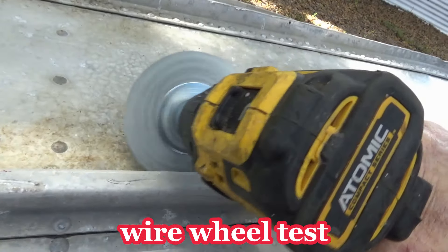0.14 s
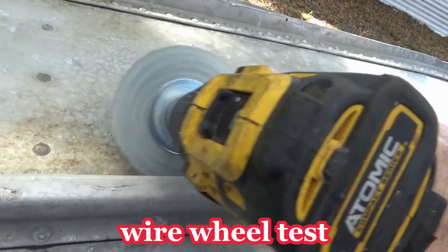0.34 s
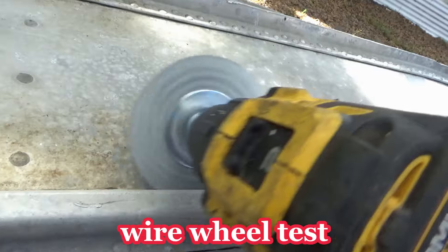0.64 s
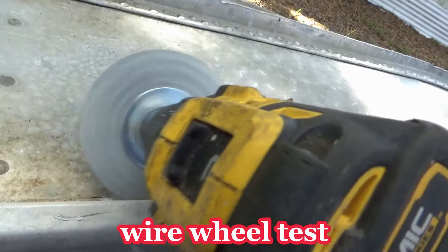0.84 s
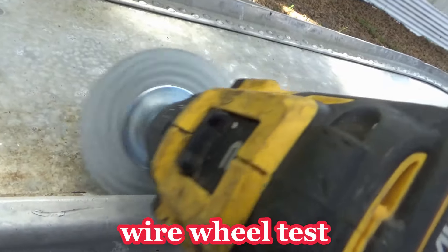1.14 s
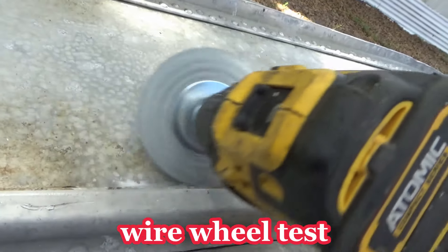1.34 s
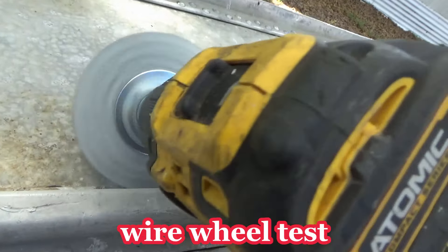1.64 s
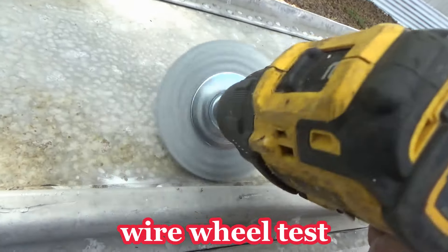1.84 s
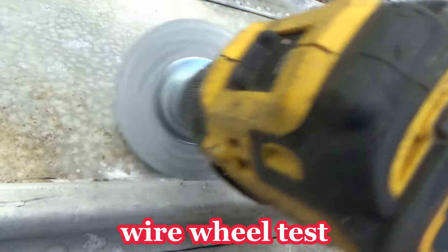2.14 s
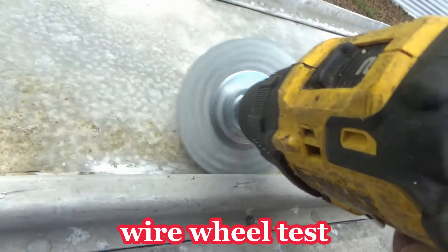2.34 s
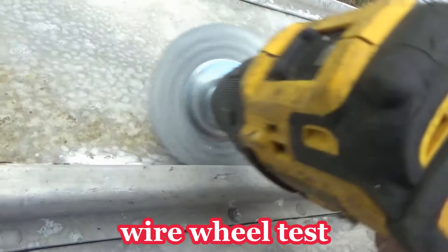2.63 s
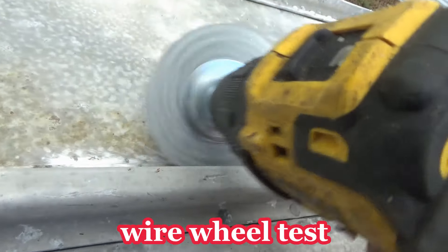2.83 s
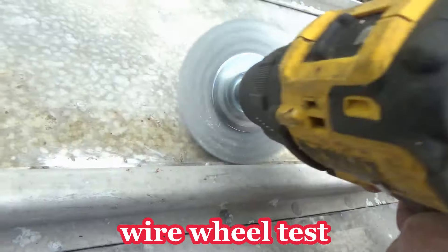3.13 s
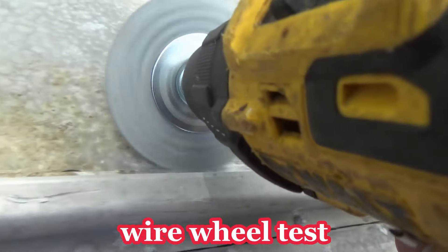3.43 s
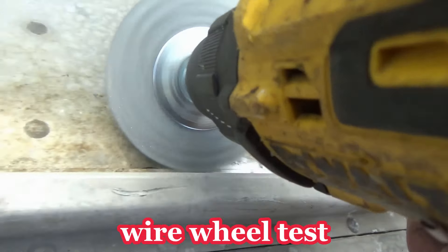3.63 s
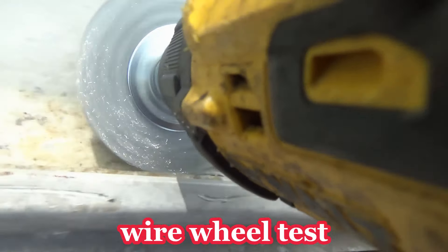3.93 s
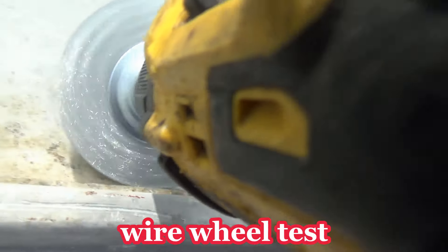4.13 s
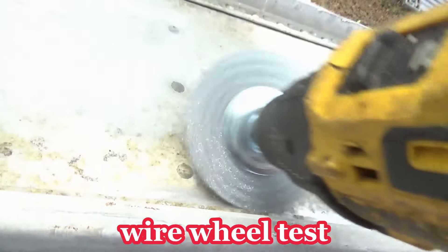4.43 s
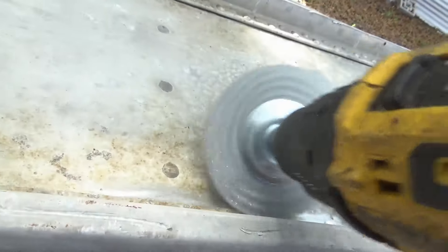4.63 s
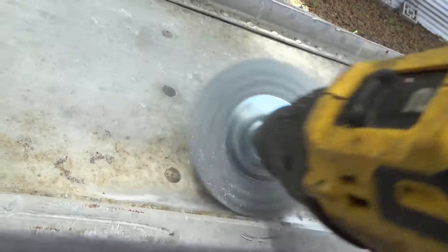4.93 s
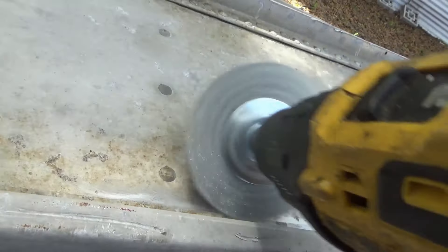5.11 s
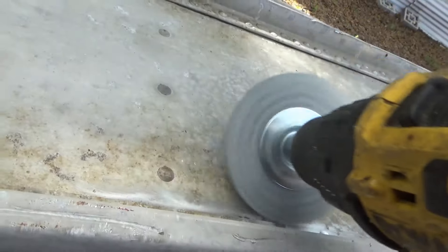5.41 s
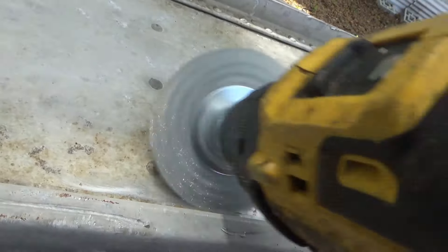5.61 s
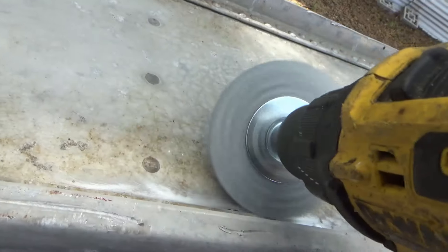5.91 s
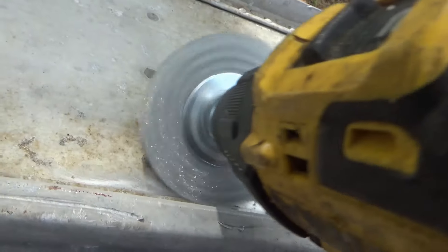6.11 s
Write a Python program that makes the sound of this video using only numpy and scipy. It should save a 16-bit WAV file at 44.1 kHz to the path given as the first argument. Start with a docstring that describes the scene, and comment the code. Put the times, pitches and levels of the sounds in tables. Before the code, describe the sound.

Continuous abrasive brushing on sheet metal: grainy mid-range clatter, bright ringing and airy hiss, already running at the start and still going at the end. A cordless drill's raspy motor whine and rougher gear tones ride through it, sagging and swelling with each stroke. High whistling appears in the later part, and a soft low bump of the hull comes near the end. Close, dry stereo microphone, work slightly to the right.

```python
"""A wire wheel in a cordless drill scrubs to and fro over the metal hull of a boat, close to the microphone.
Countless bristle tips flick the sheet: random clicks, shaped by the metal, make it clatter, ring and hiss.
The drill's motor hums and its gears whine, as tones locked to the rotor. Each push slows the rotor a little
and draws a high whistle toward the gear housing's resonance. Now and then the hull gives a soft bump."""
import sys
import numpy as np
from scipy import signal
from scipy.fft import rfft, irfft, next_fast_len
from scipy.io import wavfile

SR = 44100
rng = np.random.default_rng(int(sys.argv[2]) if len(sys.argv) > 2 else 0)


def store_wav(level_fs):
    """Save 16-bit WAV to argv[1]."""
    pcm = np.round(np.clip(np.atleast_2d(level_fs), -1, 1) * 32767)
    wavfile.write(sys.argv[1], SR, pcm.T.astype(np.int16))


N = 276013
TIME = np.arange(N) / SR  # seconds
SIZE = next_fast_len(N + 2048, True)
BINS = np.maximum(np.arange(SIZE // 2 + 1) * SR / SIZE, 1)  # Hz
GEAR_RATIO = 15.05  # rotor turns per turn of the wheel


def from_db(db):
    """Turn decibels into gain."""
    return 10 ** (np.asarray(db) / 20)


def rms_one(x):
    """Scale to unit power."""
    return x / np.sqrt(np.mean(x ** 2) + 1e-20)


def in_time(rows):
    """Give each column of a time table a value at every sample."""
    seconds, *columns = np.transpose(rows)
    return [np.interp(TIME, seconds, column) for column in columns]


def in_frequency(points):
    """Give a frequency table a value at every frequency bin, with pitch on a log scale."""
    hz, value = np.transpose(points)
    return np.interp(np.log(BINS), np.log(np.maximum(hz, 1)), value)


def drift(rate_hz):
    """Smooth random wandering, mostly slower than rate_hz; its spread is 1."""
    coarse = TIME[::20]
    hz = np.fft.rfftfreq(len(coarse), coarse[1])
    spectrum = rfft(rng.standard_normal(len(coarse))) / (1 + (hz / rate_hz) ** 2)
    slow = irfft(spectrum, len(coarse))
    return np.interp(TIME, coarse, rms_one(slow))


# The hand's strokes; where they overlap, their forces add. A force of 1 is a firm push.
# (start [s], end [s], force at start [firm pushes], force at end [firm pushes]), before the rise and fall
HAND_STROKES = [(-.27, .16, .74, 1.05), (.08, .61, .6, .68), (.52, 1.07, .56, 1.02),
                (1.08, 1.27, 1.6, 1.17), (1.15, 1.46, .56, 1.7), (1.53, 1.88, 1.27, 1.15),
                (1.95, 2.43, 1.52, .17), (2.35, 2.9, 1.42, .66), (2.76, 3.21, .72, 1.44),
                (3.22, 3.78, 1.37, .33), (3.51, 4.65, .41, .55), (4.52, 5.05, .33, 1.47),
                (5.01, 5.52, 1.12, .93), (5.47, 5.95, 1.09, 1.35), (5.8, 6.35, .35, 1.47)]
PRESS_S, EASE_S = .22, .154  # time to lean in fully, time to ease off


def pressure():
    """Force of the wheel on the hull: every stroke rises, leans in or slackens, and falls."""
    push = 0
    for start, end, first, last in HAND_STROKES:
        force = np.interp(TIME, [start, end], [first, last])
        rise_and_fall = np.minimum((TIME - start) / PRESS_S, (end - TIME) / EASE_S)
        push = push + force * np.clip(rise_and_fall, 0, 1)
    return push


# What a firm push adds to each part of the sound: {part: change in level [dB]}
FIRM_PUSH_DB = {"hum": 1.1, "second": -3, "motor": 1.5, "overtones": 4, "gears": 3, "upper gear": 6,
                "whistle": 9.5, "clatter": -0.4, "skitter": -4.5, "sheet": 1, "ring": 8, "high ring": 7.5,
                "hiss": -0.4, "rumble": 1}


def push_db(part, push):
    """Change in a part's level, in dB, in proportion to the push."""
    return FIRM_PUSH_DB[part] * push


def flicks(per_s, spread_db):
    """Bristle tips snap free at random, each with a force of its own."""
    luck = np.minimum(rng.exponential(1, SIZE), 4)
    force = from_db(spread_db * luck) * rng.standard_normal(SIZE)
    return rms_one(force * (rng.random(SIZE) < per_s / SR))


# How alike the brushing is at the two microphone ports
# (frequency [Hz], likeness [0 = unlike, 1 = the same; capped at .995])
PORT_LIKENESS = [(60, .98), (170, 0.98), (330, 1), (500, 0.88), (800, 0.35), (1200, 0.6), (1800, 0.88),
                 (2800, 0.38), (4500, 0.68), (6400, 0.43), (9000, 0.88), (10500, 1), (15000, 1)]


def brushed(colour, modes, per_s, spread_db):
    """Flicks shaped by the metal's colour and resonances; the wide sheet reaches the ports partly unlike."""
    body = 1
    for hz, width, db in modes:
        body = body + from_db(db) / (1 + 1j * (BINS ** 2 - hz ** 2) / (BINS * width))
    alike = np.clip(in_frequency(PORT_LIKENESS), 0, .995)
    mid = rfft(flicks(per_s, spread_db))
    side = rfft(flicks(per_s, spread_db))
    ports = np.sqrt(1 + alike) * mid + np.sqrt(1 - alike) * side * [[1], [-1]]
    return rms_one(irfft(ports * body * from_db(in_frequency(colour)), SIZE)[:, :N])


def whine(turns, orders, flutter_db, smear, wander):
    """Tones locked to a shaft; play between parts shakes each level and phase (smear, wander: radians)."""
    tones = 0
    for order, db in orders:
        gain = from_db(db + flutter_db * drift(67))
        phase = 2 * np.pi * (order * turns + rng.random()) + smear * drift(126) + wander * drift(20)
        tones = tones + gain * np.sin(phase)
    return rms_one(tones)


# Broad colour of the hull's clatter: (frequency [Hz], relative level per Hz [dB])
CLATTER_COLOUR = [(60, -58), (250, -44), (450, -20.5), (650, -15), (1000, -9.5), (1500, -6), (1700, -4),
                  (2050, -6.5), (2400, -6.5), (2900, -4), (4000, -37), (10000, -55)]
# Hull resonances: (frequency [Hz], width [Hz], strength against the colour [dB])
HULL_RESONANCES = [(592, 66, -10), (850, 21, -8), (1233, 49, -12.5), (1448, 61, -19.5), (1846, 180, -3.5),
                   (1870, 250, -7.5)]


def hull_clatter(level_db, push, grip_db):
    """The hull's lower resonances answer the flicks."""
    noise = brushed(CLATTER_COLOUR, HULL_RESONANCES, per_s=26000, spread_db=0.7)
    return from_db(level_db + push_db("clatter", push) + grip_db) * noise


# Broad colour of the ringing sheet: (frequency [Hz], relative level per Hz [dB])
SHEET_COLOUR = [(150, -75), (1800, -41), (2500, -5.5), (2900, -2.5), (3350, -1), (3700, -0.5), (4050, -2),
                (4600, -1.5), (5000, -4), (5400, -3), (6000, -8), (7200, -12), (10000, -43)]
# Sheet resonances: (frequency [Hz], width [Hz], strength against the colour [dB])
SHEET_RESONANCES = [(2880, 110, -9.5), (3330, 300, -7), (4240, 41, -4.5), (4640, 180, -15), (4880, 100, -5),
                    (2560, 130, -9), (5720, 200, -13)]


def sheet_ring(level_db, push, grip_db):
    """The thin sheet rings in its higher resonances under the flicks."""
    noise = brushed(SHEET_COLOUR, SHEET_RESONANCES, per_s=30000, spread_db=1.6)
    return from_db(level_db + push_db("sheet", push) + grip_db) * noise


# Colours of the tips' hiss and of their finest spray: (frequency [Hz], relative level per Hz [dB])
HISS_COLOUR, FIZZ_COLOUR = [(200, -70), (3500, -11), (5500, -4), (6500, 3), (7200, -1), (7800, 6),
                            (9200, 2), (9900, -5.5), (11000, -17), (12500, -18), (14000, -22), (15500, -31)], [(3000, -45), (8500, -4.5), (10200, 1.5), (11800, -0.5),
                                          (13500, -6.5), (15000, -19)]
# Level of the finest spray before its random swings: (time [s], level [dB])
FIZZ_LEVELS = [(0, -36.5), (.7, -37.5), (.85, -42.5), (1.05, -35.5), (1.25, -39), (1.5, -38), (2.05, -38),
               (2.65, -38.5), (2.78, -40.5), (2.92, -37.5), (3.3, -39.5), (4.1, -39), (4.3, -41.5),
               (4.75, -38), (4.97, -42), (5.1, -40.5), (5.32, -40), (5.44, -40.5), (5.56, -38.5),
               (5.88, -39), (6.1, -38), (6.26, -38)]
HISS_FOLLOWS = 0.66  # share of the spray's table swings that the hiss follows


def tip_hiss(level_db, push, grip_db):
    """The bristle tips' hiss and finest spray; the hiss partly follows the spray."""
    fizz_db, = in_time(FIZZ_LEVELS)
    bite_db = HISS_FOLLOWS * (fizz_db - fizz_db.mean()) + 0.6 * drift(16)
    hiss_gain = from_db(level_db + push_db("hiss", push) + grip_db + bite_db)
    hiss = hiss_gain * brushed(HISS_COLOUR, [], per_s=36000, spread_db=2.5)
    fizz_gain = from_db(fizz_db + grip_db + 1.3 * drift(25))
    fizz = fizz_gain * brushed(FIZZ_COLOUR, [], per_s=34000, spread_db=2.5)
    return hiss + fizz


# The two bands that ring out under a push: (frequency [Hz], relative level per Hz [dB])
RING_COLOUR, HIGH_RING_COLOUR = [(1500, -45), (2700, -27), (3000, -7.5), (3280, -3.5), (3500, -9.5),
                                 (4000, -23), (6500, -45)], [(3000, -44), (4300, -12), (4550, -7), (4750, 1), (5000, -16),
                                               (5250, -7), (6500, -35)]
# Each spot of the hull favours one band or the other; levels with no push
# (time [s], ring level [dB], high ring level [dB])
RING_LEVELS = [(0, -44, -43), (.25, -29.5, -33), (.55, -38, -41), (.8, -33, -41), (1.3, -34, -37),
               (1.8, -33.5, -37), (2.3, -37, -34), (2.52, -32.5, -36), (2.73, -42, -41), (2.95, -31, -39),
               (3.3, -53, -39), (3.75, -35.5, -35), (4.3, -31, -34), (4.55, -44, -45), (5.2, -41, -40),
               (5.8, -47, -39), (6.26, -36, -42)]


def pressed_ring(push):
    """Two bands of the sheet ring out much louder as the wheel is pressed."""
    ring_db, high_db = in_time(RING_LEVELS)
    ring_gain = from_db(ring_db + push_db("ring", push) + 1.4 * drift(16))
    ring = ring_gain * brushed(RING_COLOUR, [], per_s=30000, spread_db=-1.0)
    high_gain = from_db(high_db + push_db("high ring", push) + 1.0 * drift(14))
    return ring + high_gain * brushed(HIGH_RING_COLOUR, [], per_s=30000, spread_db=-3.5)


# The band where the lightly scraped hull sings: (frequency [Hz], relative level per Hz [dB])
SKITTER_COLOUR = [(1300, -39.5), (1700, -2.5), (1900, -3.5), (2060, 0), (2200, -2.5), (2500, -7.5),
                  (3000, -31)]
# Its level with no push: (time [s], level [dB])
SKITTER_LEVELS = [(0, -26), (.5, -27), (1.2, -29.5), (1.8, -28.5), (2.3, -30), (3.3, -28.5), (4.2, -34.5),
                  (4.6, -28), (6.26, -28.5)]


def skitter(push):
    """The hull sings while the wheel skitters lightly over it; a push quiets it."""
    level_db = in_time(SKITTER_LEVELS)[0] + push_db("skitter", push)
    return from_db(level_db) * brushed(SKITTER_COLOUR, [], per_s=24000, spread_db=-0.5)


# Narrow resonances inside the skitter band: (middle frequency [Hz], relative level [dB])
STRAND_RESONANCES = [(1730, -0.5), (1830, -1.5), (1930, -0.5), (2060, -2)]
STRANDS_DB = -2.5  # level against the skitter
STRAND_WIDTH_HZ, STRAND_WAVER_HZ, STRAND_SWELL_DB = 12, 22.99, 1.4


def strands(push):
    """Narrow hull resonances waver in pitch, swell and fade as the wheel moves from spot to spot."""
    out = 0
    for hz, db in STRAND_RESONANCES:
        pitch = hz + STRAND_WAVER_HZ * drift(4)
        # slow noise in two parts widens the tone into a narrow band
        narrow_noise = drift(STRAND_WIDTH_HZ) + 1j * drift(STRAND_WIDTH_HZ)
        ringing = narrow_noise * np.exp(2j * np.pi * np.cumsum(pitch) / SR)
        out = out + from_db(db + STRAND_SWELL_DB * drift(4)) * ringing.real
    level_db = in_time(SKITTER_LEVELS)[0] + push_db("skitter", push) + STRANDS_DB
    return from_db(level_db) * rms_one(out)


# Broad colour of the hull's rumble: (frequency [Hz], relative level per Hz [dB])
RUMBLE_COLOUR = [(20, -15), (70, -17), (130, -16), (170, -2), (215, -3), (240, 2), (290, 8), (400, 2),
                 (600, -16), (1200, -40)]


def hull_rumble(level_db, push):
    """Sparser flicks shake the hull at low pitch."""
    around_mean_db = push_db("rumble", push - push.mean())
    noise = brushed(RUMBLE_COLOUR, [], per_s=4000, spread_db=1.5)
    return from_db(level_db + around_mean_db + 1.8 * drift(9)) * noise


# Tones of the uneven tufts: (multiple of the wheel speed, relative level [dB])
TUFT_TONES = [(7, -5), (9, 6), (11, -1), (12, -2), (16, 3), (19, 1), (24, 4.5)]
# Level of their drone before random swings: (time [s], level [dB])
TUFT_LEVELS = [(0, -61.5), (1.6, -61), (2.1, -56), (2.33, -50), (2.55, -58), (2.8, -53), (3.0, -54),
               (3.28, -49.5), (3.45, -61), (5, -63.5), (6.26, -61)]


def tuft_drone(turns):
    """Uneven tufts strike the hull again on every turn of the wheel and make it drone."""
    gain = from_db(in_time(TUFT_LEVELS)[0] + 2.4 * drift(4.6))
    return gain * whine(turns / GEAR_RATIO, TUFT_TONES, flutter_db=5.0, smear=0.26, wander=.25)


# Slow changes as the wheel travels over the hull, before the push and random swings
# (time [s], hull clatter level [dB], sheet ring level [dB], tip hiss level [dB], hull rumble level [dB])
BRUSHING_LEVELS = [(0, -24.5, -22.5, -27.5, -58), (1.6, -24.5, -23.5, -25.5, -59),
                   (2.4, -24, -24.5, -26, -56), (3.1, -24.5, -23.5, -25.5, -57),
                   (3.7, -24, -24.5, -28, -61), (4.28, -25, -24, -28, -53), (4.5, -25, -25, -25, -70),
                   (5.3, -25.5, -25, -25, -64), (6.26, -24.5, -25.5, -29, -62)]


def wire_wheel(turns, push):
    """The bristles drive the hull from rumble to hiss; the drill's shake ripples the upper parts."""
    clatter_db, sheet_db, hiss_db, rumble_db = in_time(BRUSHING_LEVELS)
    grip_db = 0.75 * drift(25) + 0.13 * drift(12.0)
    ripple = 1 + 0.095 * np.sin(2 * np.pi * turns)  # once per rotor turn
    upper = sheet_ring(sheet_db, push, grip_db) + pressed_ring(push) + tip_hiss(hiss_db, push, grip_db)
    lower = hull_clatter(clatter_db, push, grip_db) + skitter(push) + hull_rumble(rumble_db, push)
    return ripple * upper + lower + tuft_drone(turns)


# Rotor speed running free at the start, its steady decline, and its sag under a firm push
FREE_HZ, DECLINE_HZ_PER_S, SAG_HZ = 378.2, 2.74, 15


def rotor_turns(push, wobble, unrest):
    """The rotor sags under a push; drag sways it once per turn of the uneven wheel, and at random."""
    speed = FREE_HZ - DECLINE_HZ_PER_S * TIME - SAG_HZ * push
    wheel = np.cumsum(speed) / SR / GEAR_RATIO
    unevenness = 1 + wobble * np.sin(2 * np.pi * wheel) + unrest * drift(21.7)
    return np.cumsum(speed * unevenness) / SR


# Motor tones that swell together: (multiple of the rotor speed, relative level [dB])
MOTOR_TONES = [(8, 0), (7.67, -16), (7.87, -21), (8.2, -18)]
# Their level with no push, before random swings: (time [s], level [dB])
MOTOR_LEVELS = [(0, -26), (.3, -23), (.5, -26.5), (.65, -25), (1.05, -24.5), (1.24, -24), (1.4, -27),
                (1.62, -29), (2.15, -29.5), (2.27, -34), (2.55, -31), (2.72, -48), (2.84, -36),
                (3.0, -29.5), (3.2, -33), (3.55, -39), (3.8, -34), (4.3, -29), (4.55, -40), (4.82, -32.5),
                (5.1, -46), (5.25, -32), (5.5, -41), (5.72, -34), (6.26, -38)]
# Fainter motor tones: (multiples of the rotor speed)
OVERTONES = [4, 16, 19]
# (time [s], level [dB] of each fainter tone in turn, with no push)
OVERTONE_LEVELS = [(0, -63, -36, -36.5), (1.2, -43, -34, -36.5), (2.2, -46, -45, -47),
                   (4.2, -43.5, -42, -46), (6.26, -43.5, -47, -45)]


def motor_whine(turns, push):
    """The motor poles whine; side tones beat against the main one and make it rasp."""
    gain = from_db(in_time(MOTOR_LEVELS)[0] + push_db("motor", push) + 1.46 * drift(32))
    motor = gain * whine(turns, MOTOR_TONES, flutter_db=0.65, smear=0.38, wander=0.39)
    for order, db in zip(OVERTONES, in_time(OVERTONE_LEVELS)):
        tone = whine(turns, [(order, 0)], flutter_db=3.0, smear=0.46, wander=.3)
        motor += from_db(db + push_db("overtones", push)) * tone
    return motor


# Gear tones: (multiple of the rotor speed, relative level [dB])
GEAR_TONES = [(12.72, 0), (11.72, -15)]
# Levels of these and of the upper gear tone with no push, before random swings: (time [s], level [dB])
GEAR_LEVELS, UPPER_GEAR_LEVELS = [(0, -32.5), (.85, -51), (1.5, -36), (2.3, -35), (3.2, -32.5), (3.6, -33),
                                  (3.9, -29.5), (4.3, -28.5), (4.45, -33.5), (4.64, -36), (4.74, -31.5),
                                  (5.1, -35.5), (5.4, -33), (5.7, -34), (6.26, -34)], [(0, -42.5), (2.4, -40), (3.4, -40), (4.2, -31.5),
                                                      (4.5, -42), (5.4, -54), (6.26, -32)]


def gear_whine(turns, push):
    """The gears whine roughly at multiples of the rotor speed, louder under load."""
    gain = from_db(in_time(GEAR_LEVELS)[0] + push_db("gears", push) + 1.8 * drift(22))
    gears = gain * whine(turns, GEAR_TONES, flutter_db=2.5, smear=0.51, wander=0.73)
    upper_gain = from_db(in_time(UPPER_GEAR_LEVELS)[0] + push_db("upper gear", push))
    return gears + upper_gain * whine(turns, [(13.72, 0)], flutter_db=1.0, smear=1.1, wander=0.74)


HOUSING_HZ, HOUSING_WIDTH_HZ = 9080, 560


def housing(hz):
    """The gear housing's resonance: its gain for a tone of this pitch."""
    return 1 / np.hypot(1, 2 * (hz - HOUSING_HZ) / HOUSING_WIDTH_HZ)


# Levels of the two whistles before the housing's gain, the push and random swings: (time [s], level [dB])
WHISTLE_LEVELS, LOW_WHISTLE_LEVELS = [(0, -50), (1.1, -55), (1.7, -40), (2.6, -37.5), (3.1, -36),
                                      (3.4, -41), (4.2, -45), (4.6, -41), (4.78, -38), (5.3, -36),
                                      (5.8, -38.5), (6.05, -37), (6.26, -39)], [(0, -58), (1.6, -52), (2.4, -33), (3.8, -40),
                                                             (4.6, -34), (6.26, -28)]
WHISTLE_ORDER, LOW_WHISTLE_ORDER = 26.46, 25.46  # multiples of the rotor speed


def gear_whistles(turns, push):
    """Two high gear whistles grow loud as they glide toward the housing's resonance."""
    speed = np.gradient(turns) * SR
    gain = from_db(in_time(WHISTLE_LEVELS)[0] + push_db("whistle", push) + 1.1 * drift(10))
    tone = whine(turns, [(WHISTLE_ORDER, 0)], flutter_db=3.0, smear=0.46, wander=0.54)
    low_gain = from_db(in_time(LOW_WHISTLE_LEVELS)[0])
    low_tone = whine(turns, [(LOW_WHISTLE_ORDER, 0)], flutter_db=2.0, smear=1.4, wander=1.0)
    whistle = gain * housing(WHISTLE_ORDER * speed) * tone
    return whistle + low_gain * housing(LOW_WHISTLE_ORDER * speed) * low_tone


# Slow changes as the drill is moved about: levels of the hum and of its second harmonic with no push
# (time [s], level [dB])
HUM_LEVELS, SECOND_LEVELS = [(0, -46), (2.1, -43), (2.7, -47), (4.1, -40.5), (4.7, -45.5), (6.26, -45.5)], [(0, -38.5), (.9, -47), (1.7, -41), (3.05, -42.5),
                                                (3.3, -36), (3.7, -42.5), (4.3, -44.5), (6.26, -39.5)]


def rotor_hum(turns, push):
    """The rotor's unbalance hums cleanly, once and twice per turn."""
    gain = from_db(in_time(HUM_LEVELS)[0] + push_db("hum", push))
    hum = gain * whine(turns, [(1, 0)], flutter_db=2.0, smear=.03, wander=0)
    second_gain = from_db(in_time(SECOND_LEVELS)[0] + push_db("second", push))
    return hum + second_gain * whine(turns, [(2, 0)], flutter_db=4.5, smear=0.1, wander=0)


def drill(turns, push):
    """All tones of the drive follow the one rotor."""
    tones = motor_whine(turns, push) + gear_whine(turns, push)
    return tones + gear_whistles(turns, push) + rotor_hum(turns, push)


# Moments when the hull flexes: (time [s], level [dB]), before the modes' own levels and the soft onset
BUMP_TIMES = [(2.35, -47), (3.29, -46), (5.712, -31)]
# Low hull modes: (frequency [Hz], relative level [dB], time to fade by 60 dB [s])
BUMP_RESONANCES = [(155, -14, 0.21), (254, -5, 0.18), (295, -4, .14)]


def bumps():
    """The flexing hull swells softly and rings briefly in its low modes."""
    out = np.zeros(N)
    for start, level_db in BUMP_TIMES:
        age = np.maximum(TIME - start, 0)
        ring = 0
        for hz, db, t60 in BUMP_RESONANCES:
            ring = ring + from_db(level_db + db - 60 * age / t60) * np.sin(2 * np.pi * hz * age)
        out += ring * (1 - np.exp(-age / 0.0073))  # soft onset
    return out


# Difference in level between the ports: (frequency [Hz], left minus right [dB])
PORT_LEAN = [(60, 0), (160, 0.5), (350, -1), (500, -2), (750, -4.5), (1200, -3.5), (2000, -4.5),
             (3300, -3.5), (4500, -2.5), (6400, -2), (9000, -1.5), (10500, -0.5)]
# Difference in phase between the ports: (frequency [Hz], lead of the left [rad])
PORT_LEAD = [(100, 0), (350, 0.25), (690, 0.15), (1380, 1), (2070, 0.0096), (2900, 0.74), (4570, 0.54),
             (6400, 0.32), (8000, 0.29), (9500, 0.48), (11000, 0), (15300, 0.1)]


def place(x):
    """The work lies to the right of two closely spaced ports, so level and phase differ between them."""
    half = from_db(in_frequency(PORT_LEAN) / 2) * np.exp(.5j * in_frequency(PORT_LEAD))
    return irfft(rfft(x, SIZE) * np.array([half, 1 / half]), SIZE)[:, :N]


# The work drifts off to the right as the hand comes nearer
# (time [s], change in the difference between the ports [dB])
OFF_AXIS_DRIFT = [(0, -6.5), (3.8, 0), (6.26, -1)]


def drift_right(ports):
    """The further off axis the wheel works, the more the two ports differ."""
    off_axis_db, = in_time(OFF_AXIS_DRIFT)
    mid = ports.mean(axis=0)
    return mid + from_db(off_axis_db) * (ports - mid)


def scene():
    """Wheel, drill and hull together; the hand's pressure drives wheel and drill."""
    push = pressure()
    turns = rotor_turns(push, wobble=0.002, unrest=0.001463)
    hull = wire_wheel(turns, push) + strands(push) + bumps()
    return drift_right(place(hull)) + place(drill(turns, push))


def record(dry):
    """The treble is cut steeply above 15 kHz."""
    low_pass = signal.ellip(10, .1, 80, 15000, fs=SR, output="sos")
    return signal.sosfilt(low_pass, dry)


dry = scene()
out = record(dry)
store_wav(out)
```